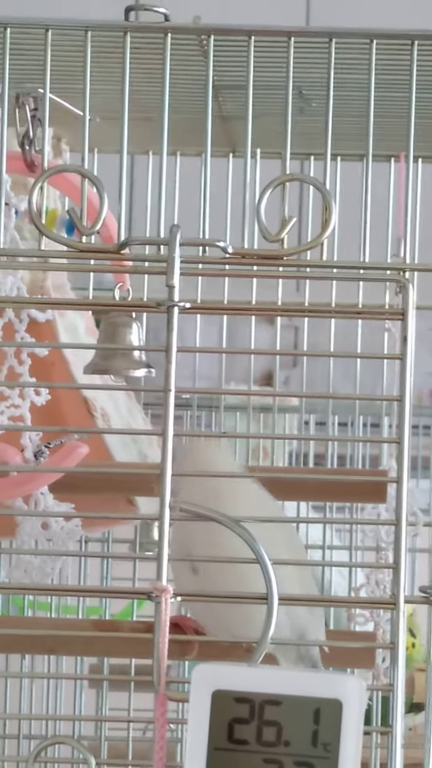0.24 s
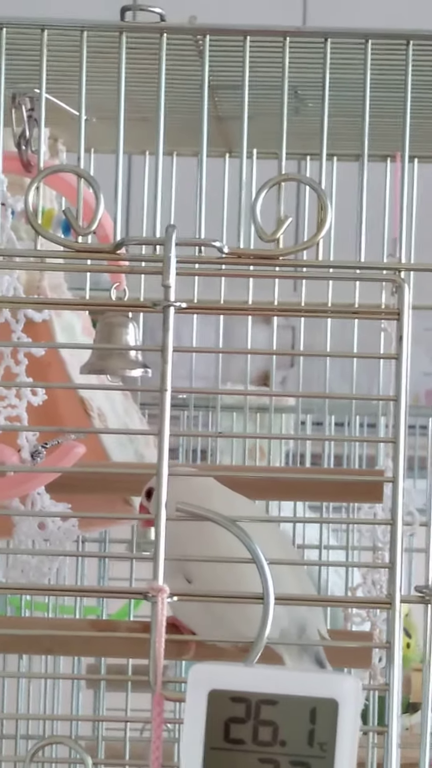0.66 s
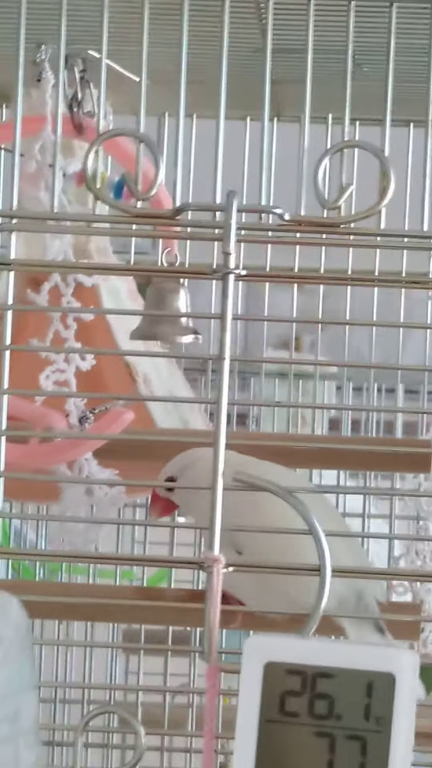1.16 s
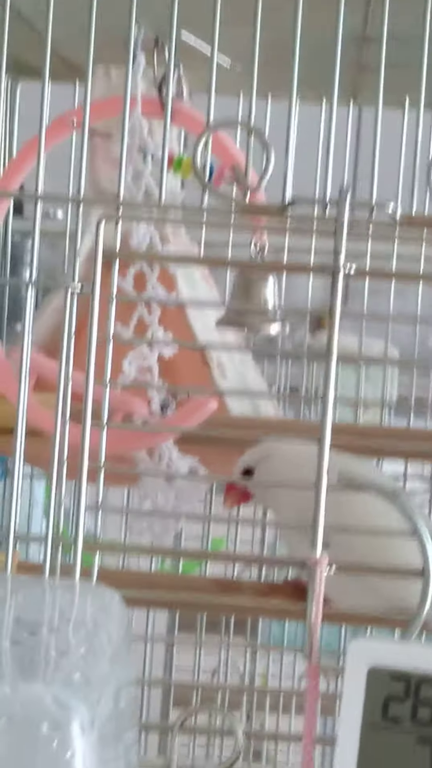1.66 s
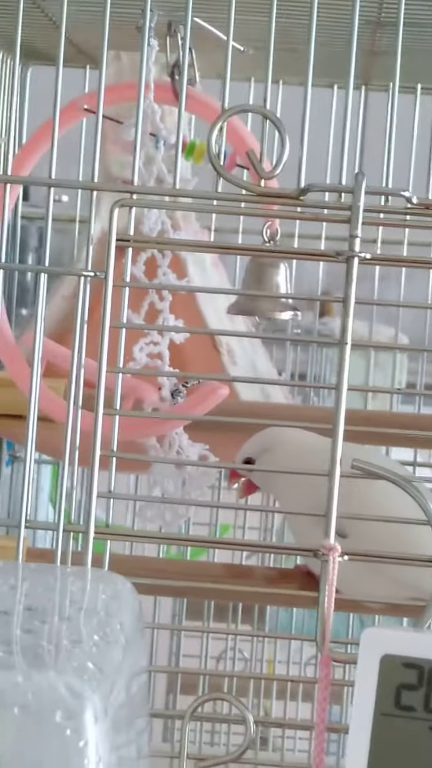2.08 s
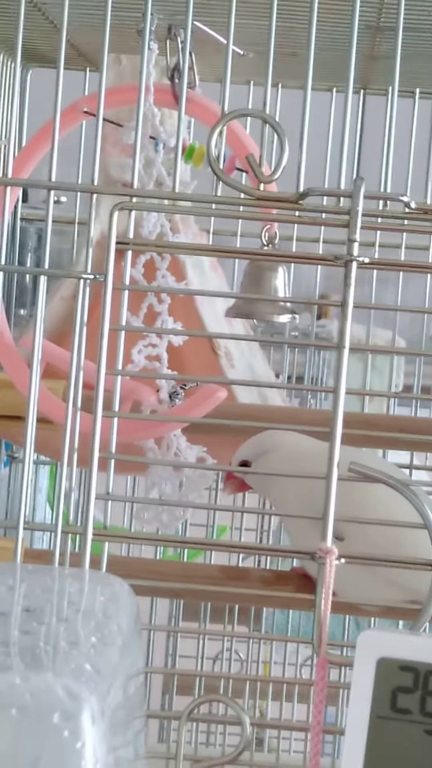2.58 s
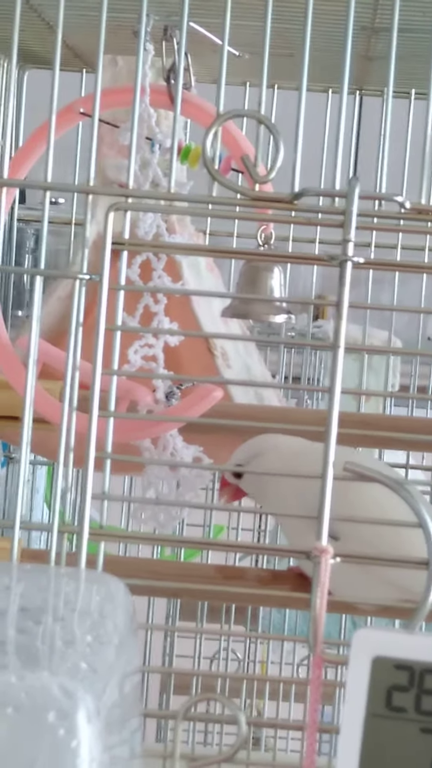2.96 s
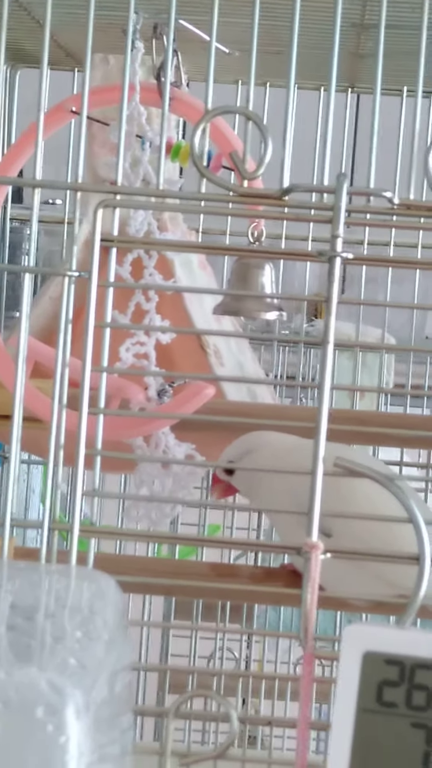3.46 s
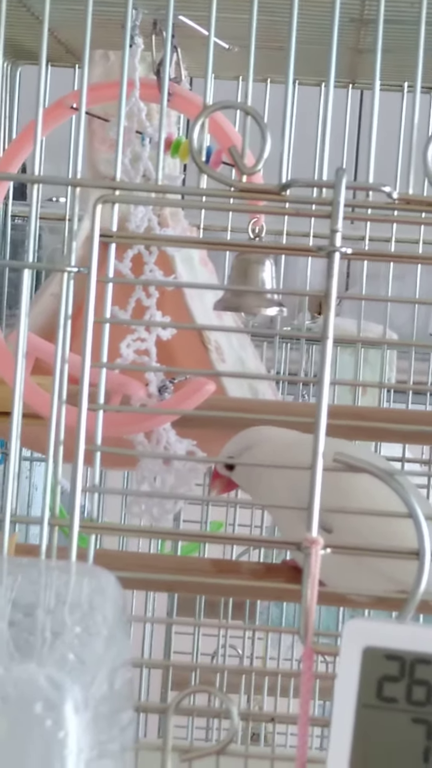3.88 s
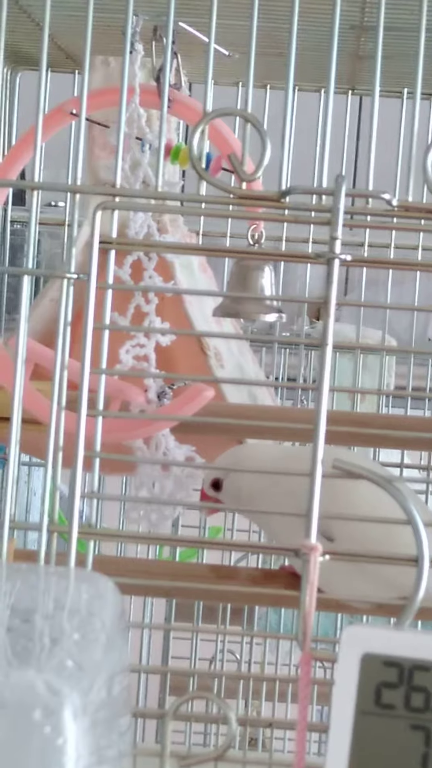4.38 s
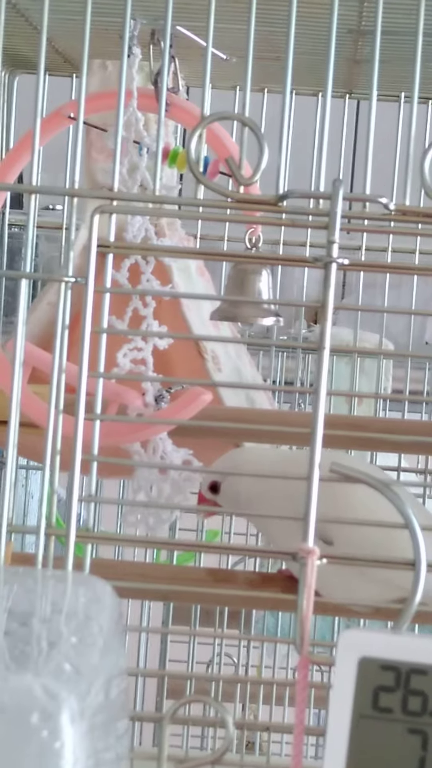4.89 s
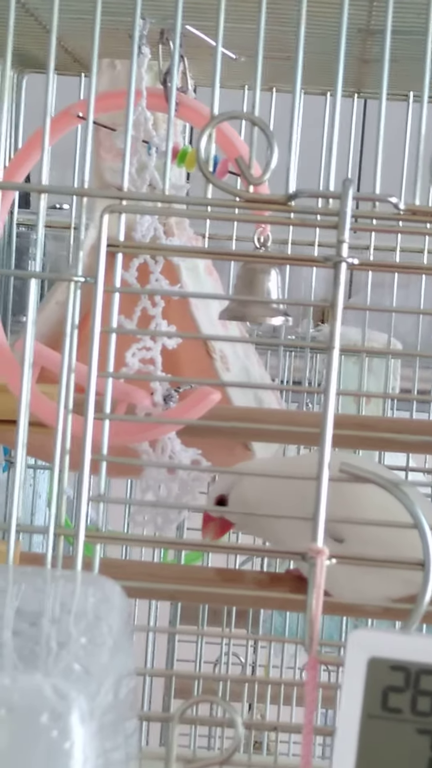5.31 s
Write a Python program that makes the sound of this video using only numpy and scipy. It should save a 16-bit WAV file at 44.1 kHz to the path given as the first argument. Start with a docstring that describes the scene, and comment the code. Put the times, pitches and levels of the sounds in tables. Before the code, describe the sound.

A small finch sings close by in a wire cage in a quiet room. Its short chips speed up and run into a bright, rapid trill. It then repeats a phrase of a high tink, a soft chip and a buzzy falling whistle, about twice a second. The song sits on the right, while a low rumble and a few dull handling bumps come on the left during the chips and trill.

```python
"""In a quiet room a small finch sings in a wire cage: chips that come ever faster, a bright trill,
then a repeated phrase of a high tink, a soft chip and a buzzy falling slur. Each note is a vibration
of a membrane in the syrinx, filtered by the throat; the cage tray and walls add reflections.
A phone close by takes the song at its right port. The left port is covered, most likely by a finger,
whose rubbing and bumping reach it as structure-borne rumble while the phone is moved."""
import sys
import numpy as np
from scipy import signal
from scipy.fft import rfft, irfft
from scipy.io import wavfile

SR = 44100
rng = np.random.default_rng(int(sys.argv[2]) if len(sys.argv) > 2 else 0)


def waveform_to_disk(signal):
    """Save audio, clipped to [-1, 1], as 16-bit WAV at the path in sys.argv[1]."""
    frames = np.transpose(np.atleast_2d(signal))
    scaled = np.clip(frames, -1, 1) * 32767
    samples = np.round(scaled).astype(np.int16)
    wavfile.write(sys.argv[1], SR, samples)


N = 244314


def syrinx(pitch, amplitude, harmonics_db):
    """Nonlinear membrane vibration: a harmonic series whose third and higher terms grow with pressure."""
    phase = 2 * np.pi * np.cumsum(pitch) / SR
    pressure = np.sqrt(amplitude / amplitude.max())
    wave = 0
    for k, db in enumerate(harmonics_db, start=1):
        gain = undb(db) * (pressure if k > 2 else 1)
        wave = wave + gain * np.sin(k * phase) * (k * pitch < SR / 2)
    return amplitude * wave


def note(hz, db, attack_s, hold_s, release_s, scoop, rise, waver):
    """Glide and envelope: pitch starts low by the fraction scoop, reaching hz at the fraction rise."""
    t = np.arange(int((attack_s + hold_s + release_s) * SR)) / SR
    flat = scoop * np.cos(np.pi / 2 * np.minimum(t / t[-1] / rise, 1)) ** 2
    pitch = hz * (1 - flat) * (1 + waver * wander(len(t), 507))
    return pitch, undb(db) * swell(t, attack_s, hold_s, release_s)


# Repeated phrases, with relative levels:
# (time [s], tink frequency [Hz], tink level [dB], slur delay [s], slur level [dB])
PHRASES = [(2.786, 6220, -28, 0.16, -23), (3.221, 6050, -32, 0.16, -23.5), (3.672, 5896, -31, 0.16, -24),
           (4.144, 5993, -29.5, 0.16, -22.5), (4.592, 5934, -28.5, .165, -23.5),
           (5.064, 5940, -27, 0.17, -21.5), (5.530, 5900, -27, .164, -22)]
def phrases(slur_ratio=1.155):
    """Two registers of one voice: loud whistles (tink, slur) and the soft murmurs between them."""
    whistles, murmurs = np.zeros((2, N))
    for s, hz, tink_db, delay_s, slur_db in PHRASES:
        add(whistles, s, tink(hz, tink_db))
        add(murmurs, s + .012, rasp())
        add(murmurs, s + .023, chip(hz=2007, db=-36))
        add(murmurs, s + .09, coo(hz=881, length_s=.044, db=-51))
        add(whistles, s + delay_s, slur(hz * slur_ratio, slur_db))
    return whistles, murmurs


def slur(hz, db, length_s=.21, hook_s=.012, buzz_hz=140, slowing=.25):
    """Amplitude and frequency modulation: a slow second vibration chops a falling whistle into sweeps."""
    swing, jitter, dip_db, uneven_db = .17, .06, 16, 3
    t = np.arange(int(length_s * SR)) / SR
    onset = np.clip((t - hook_s) / .006, 0, 1)  # the hook stays clean
    rate = buzz_hz * (1 - slowing * t / length_s) * (1 + .15 * wander(len(t), 100))
    cycle = np.cumsum(rate * (t > hook_s)) / SR % 1
    buzz = onset * (1 - (t / length_s) ** 2)  # smooths out as the pressure runs down
    pitch = slur_pitch(t, hz, hook_s) * (1 + .011 * wander(len(t), 501))
    sweep = swing * (1 - 2 * cycle) + jitter * wander(len(t), 400.2)
    pitch *= 1 + buzz * sweep
    chop_db = buzz * dip_db * (np.sin(np.pi * cycle) - 1)
    flicker_db = onset * uneven_db * wander(len(t), 116.7)
    amplitude = slur_envelope(t) * undb(db + chop_db + flicker_db)
    gain, overtone_db = throat(pitch)
    voice = syrinx(pitch, amplitude * gain, [0, overtone_db])
    return signal.sosfilt(signal.butter(12, 7700, fs=SR, output="sos"), voice)


def slur_pitch(t, hz, hook_s, hook_dip=.1305, fall_s=.0195, fall_power=.75):
    """Power-law glide: after a brief dip and recovery, the hook, the pitch falls ever more slowly."""
    hook = 1 - hook_dip * np.sin(np.pi * np.minimum(t / hook_s, 1) ** 1.525)
    fall = (1 + np.maximum(t - hook_s, 0) / fall_s) ** -fall_power
    return hz * hook * fall


def slur_envelope(t, start_db=4, sag_db_per_s=110, break_s=.084, tail_db=-6.5):
    """Exponential decay as the pressure sags; the voice breaks off midway and returns softer."""
    head = swell(t, attack_s=.0093, hold_s=.051, release_s=.011) ** 2
    tail = swell(t - break_s, attack_s=.0067, hold_s=.1, release_s=.025)
    return undb(start_db - sag_db_per_s * t) * (head + undb(tail_db) * tail)


def throat(pitch, hollow_hz=4300, width_hz=700, hollow_db=-2.5, second_db=-11, cutoff_hz=7000):
    """Tract filtering: the voice thins between two resonances; its overtone passes below a cutoff."""
    gain = undb(hollow_db * np.exp(-((pitch - hollow_hz) / width_hz) ** 2))
    overtone_db = second_db - 20 * np.log10(1 + (2 * pitch / cutoff_hz) ** 16)
    return gain, overtone_db


def tink(hz, db):
    """A tone burst: a high whistle that starts abruptly and dies at once."""
    contour = note(hz, db, attack_s=.0003, hold_s=.0029, release_s=.0033, scoop=.096, rise=.16, waver=.02)
    return syrinx(*contour, [0])


def rasp(hz=2870, db=-44):
    """Random frequency modulation roughens a faint tone."""
    contour = note(hz, db, attack_s=.003, hold_s=.0099, release_s=.0051, scoop=.045, rise=.48, waver=.109)
    return syrinx(*contour, [0])


# Course of the trill, with harmonics relative to the fundamental: (time [s], mid-glide frequency [Hz],
# relative level [dB], second harmonic [dB], third harmonic [dB], fourth harmonic [dB])
TRILL_COURSE = [(1.862, 1473, -27.5, -5, -25, -32), (1.894, 1577, -26, 8.5, -8.5, -13),
                (1.928, 1784, -22, 4.5, -8.5, -14.5), (2.031, 1622, -25, 5.5, -8, -12),
                (2.097, 1516, -28.5, 2.5, -7, -3.5), (2.136, 1632, -25, -0.5, -10.5, -2.5),
                (2.179, 1497, -29.5, -4, -13, 2.5), (2.40, 1516, -29, -1.5, -8, -5),
                (2.516, 1453, -30.5, -1, -4, -3.5)]
def trill(count=19, start_s=1.8624, attack_s=.007, release_s=.0089, flat_hz=1300, full_hz=1680):
    """Formant shift: over a run of rising notes, the throat resonance moves from harmonic 2 to 4."""
    first_gap_s, last_gap_s, tiring_notes = .031255, .040145, 8.158  # the trill slows as the bird tires
    out, s = np.zeros(N), start_s
    times, *course = np.transpose(TRILL_COURSE)
    for k in range(count):
        hz, db, second_db, third_db, fourth_db = (np.interp(s, times, column) for column in course)
        # higher, harder notes are shorter, glide further and come to a sharper peak
        effort = np.clip((hz - flat_hz) / (full_hz - flat_hz), .25, 1)
        stretch, scoop = 1 + .42 * (1 - effort), .29 * effort
        pitch, amplitude = note(hz * (1 + scoop / 2), db, attack_s * stretch, 0, release_s * stretch,
                                scoop, rise=.92, waver=.025)
        spike_db = 3 * effort * ((amplitude / amplitude.max()) ** 4 - .5)
        bright_db = (third_db + fourth_db) / 2
        harmonics_db = [0, second_db, third_db, fourth_db, bright_db - 7, bright_db - 17]
        add(out, s, syrinx(pitch, amplitude * undb(spike_db), harmonics_db))
        s += last_gap_s + (first_gap_s - last_gap_s) * np.exp(-k / tiring_notes)
    return out


# Chips before the trill: (time [s], second-harmonic frequency [Hz], relative level [dB])
OPENING_CHIPS = [(-.004, 2433, -27), (.225, 1836, -44.5), (0.414, 2474, -24.5), (.539, 1844, -42.5),
                 (0.627, 2420, -29), (.789, 1840, -43.5), (0.872, 2300, -27.5), (1.077, 2506, -23),
                 (1.180, 1886, -42.5), (1.280, 2350, -28.5), (1.368, 2400, -26.5), (1.449, 2337, -25.5),
                 (1.532, 2225, -25.5), (1.613, 2490, -25), (1.694, 2330, -25.5), (1.776, 2130, -28.5)]
def opening_chips():
    """A pulse train of rising repetition rate leads up to the trill."""
    out = np.zeros(N)
    for s, hz, db in OPENING_CHIPS:
        add(out, s, chip(hz, db))
    return out


def chip(hz, db):
    """Throat resonance selects the second harmonic of a quick upward flick as the pitch heard."""
    contour = note(hz / 2, db, attack_s=.0035, hold_s=.0061, release_s=.0018,
                   scoop=.2516, rise=.744, waver=.025)
    return syrinx(*contour, harmonics_db=[-22, 0, -23, -24, -31])


# Soft low notes, including the trill's late last note:
# (time [s], frequency [Hz], duration [s], relative level [dB])
LOW_NOTES = [(1.823, 1138, 0.019, -37.5), (2.568, 1370, 0.016, -35.5), (2.645, 1030, 0.016, -46.5),
             (2.691, 1127, 0.039, -37), (4.193, 1480, 0.089, -47), (5.487, 1058, .068, -49)]
def soft_low_notes():
    """Weak voicing in the low register: the trill's last note, and notes around it and the phrases."""
    out = np.zeros(N)
    for s, hz, length_s, db in LOW_NOTES:
        add(out, s, coo(hz, length_s, db))
    return out


def coo(hz, length_s, db):
    """With the beak nearly shut, the fundamental dominates a quiet, unsteady low note."""
    edge_s = length_s / 4
    contour = note(hz, db, edge_s, length_s / 2, edge_s, scoop=.05, rise=.4, waver=.05)
    return syrinx(*contour, harmonics_db=[0, -12])


# Reflections from the cage tray and nearby walls: (delay [s], gain [dB])
REFLECTIONS = [(.0034, -29), (.0078, -5), (0.0117, -8.5), (0.0153, -12), (0.0225, -14)]
def room(sound, tail_db=1.5, t60_low_s=.34, t60_high_s=.37, build_s=.0038):
    """Convolution with an impulse response: early reflections, then a short diffuse tail."""
    t = np.arange(SR // 2) / SR
    scatter = rng.standard_normal(len(t))
    low = signal.sosfiltfilt(signal.butter(2, 4000, fs=SR, output="sos"), scatter)
    tail = low * undb(-60 * t / t60_low_s) + (scatter - low) * undb(-60 * t / t60_high_s)
    tail *= 1 - np.exp(-t / build_s)
    response = undb(tail_db) * tail / np.linalg.norm(tail)
    for s, db in REFLECTIONS:
        add(response, s, undb([db]))
    return signal.fftconvolve(sound, response)[:N]


# Spectrum of the rubbing finger: (frequency [Hz], relative spectral density [dB])
RUB_SPECTRUM = [(8, 5.5), (18, -7), (38, 4.5), (65, -10), (110, -17.5), (200, -27.5), (400, -40),
                (800, -76), (2000, -85)]
def finger_rub(start_s=1.19, attack_s=.031, settle_s=1.713, db=-19, fade_db_per_s=67):
    """Friction at the port excites a rumble that dies away as the hand settles."""
    t = np.arange(N) / SR
    rumble = noise(*np.transpose(RUB_SPECTRUM))
    onset = np.clip((t - start_s) / attack_s, 0, 1)
    level_db = db - fade_db_per_s * np.maximum(t - settle_s, 0)
    return onset * undb(level_db) * rumble / rumble.std()


# Finger impacts on the phone: (time [s], frequency [Hz], level [dB])
FINGER_IMPACTS = [(0.184, 30, -22.5), (1.196, 37.4, -7), (1.254, 36, -20.5), (1.354, 48, -14.5),
                  (1.672, 45, -17), (1.702, 38.3, -15)]
def finger_bumps(decay_s=.022):
    """Damped oscillation: each dull impact rings for a cycle or two."""
    out = np.zeros(N)
    t = np.arange(SR // 5) / SR
    for s, hz, db in FINGER_IMPACTS:
        add(out, s, -undb(db) * np.sin(2 * np.pi * hz * t) * np.exp(-t / decay_s))
    return out


# Steady noise floor: (frequency [Hz], left spectral density [dB re 1/Hz], right [dB re 1/Hz])
NOISE_FLOOR = [(8.2, -52.5, -52), (17.4, -51.5, -70), (26.3, -64.5, -68.5), (37.8, -56.5, -53.5),
               (62.5, -69.5, -72.5), (111.4, -82, -68), (179, -89.5, -77), (357, -92.5, -84),
               (780, -96.5, -87), (1390, -98, -88), (3150, -99, -96), (8150, -99.6, -96),
               (13000, -98.5, -96)]
def background():
    """Stationary noise, strongest in the deep bass and uncorrelated between left and right."""
    hz, left_db, right_db = np.transpose(NOISE_FLOOR)
    return np.array([noise(hz, left_db), noise(hz, right_db)])


def noise(hz, db):
    """Spectral shaping of white noise to the density db at the frequencies hz."""
    f = np.maximum(np.fft.rfftfreq(N, 1 / SR), 1)
    gain = undb(np.interp(np.log(f), np.log(hz), db)) * np.sqrt(SR / 2)
    return irfft(rfft(rng.standard_normal(N)) * gain, N)


def wander(size, rate_hz):
    """Random fluctuation, interpolated between Gaussian values, with a spread near 1."""
    place = np.arange(size) * rate_hz / SR
    knots = rng.standard_normal(int(place[-1]) + 2)
    return np.interp(place, np.arange(len(knots)), knots)


def swell(t, attack_s, hold_s, release_s):
    """Raised-cosine envelope, silent before and after."""
    edge = np.minimum(t / attack_s, (attack_s + hold_s + release_s - t) / release_s)
    return np.sin(np.pi / 2 * np.clip(edge, 0, 1)) ** 2


def undb(db):
    """Decibels to amplitude ratio."""
    return 10 ** (np.asarray(db) / 20)


def add(track, s, sound):
    """Superposition of a sound on a track at time s."""
    start = int(round(s * SR))
    lo, hi = max(start, 0), min(start + len(sound), len(track))
    if hi > lo:
        track[lo:hi] += sound[lo - start:hi - start]


def scene(song_db=-2, trill_direct_db=2.5, whistle_direct_db=-1, covered_db=-37):
    """Direct and reflected song sum at the open right port; occlusion leaves the left mostly rumble."""
    whistles, murmurs = phrases()
    small_notes = opening_chips() + soft_low_notes() + murmurs
    trilled = trill()
    # directivity: a wide open beak beams more sound straight at the phone
    direct = small_notes + undb(trill_direct_db) * trilled + undb(whistle_direct_db) * whistles
    song = undb(song_db) * (direct + room(small_notes + trilled + whistles))
    left = undb(covered_db) * song + finger_rub() + finger_bumps()
    return np.array([left, song]) + background()


def record(dry, cutoff_hz=15900):
    """Band limiting: the phone's steep low-pass filter removes the highest treble."""
    return signal.sosfilt(signal.ellip(10, .2, 80, cutoff_hz, fs=SR, output="sos"), dry)


dry = scene()
out = record(dry)
waveform_to_disk(out)
```